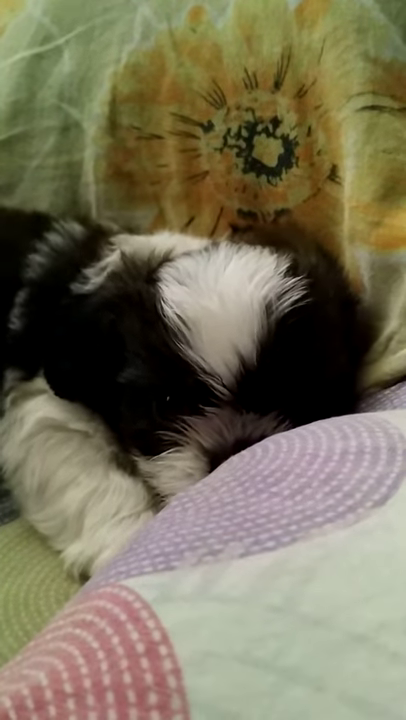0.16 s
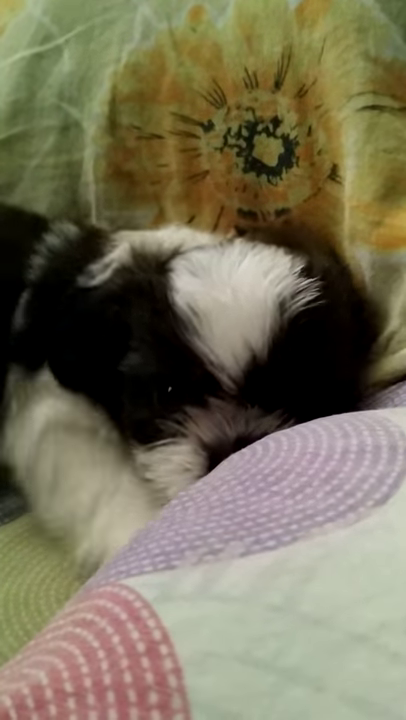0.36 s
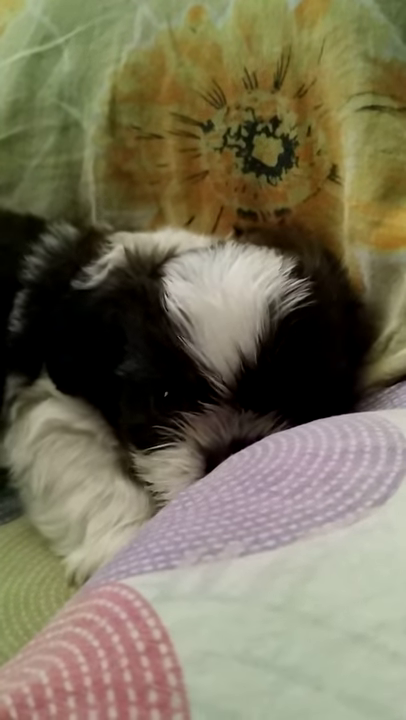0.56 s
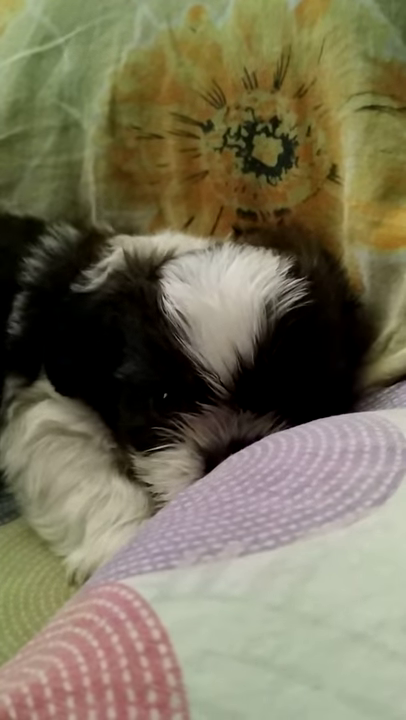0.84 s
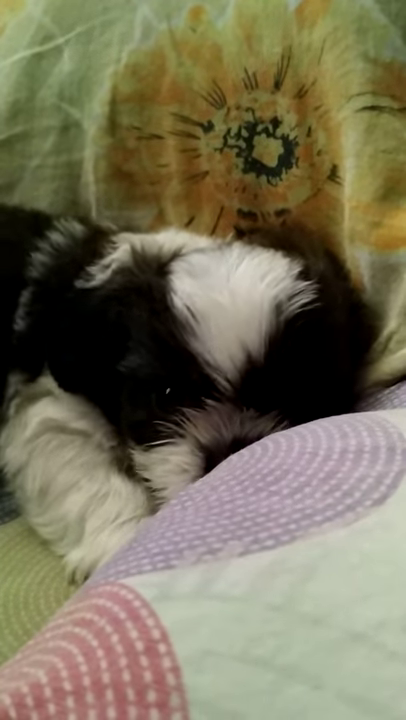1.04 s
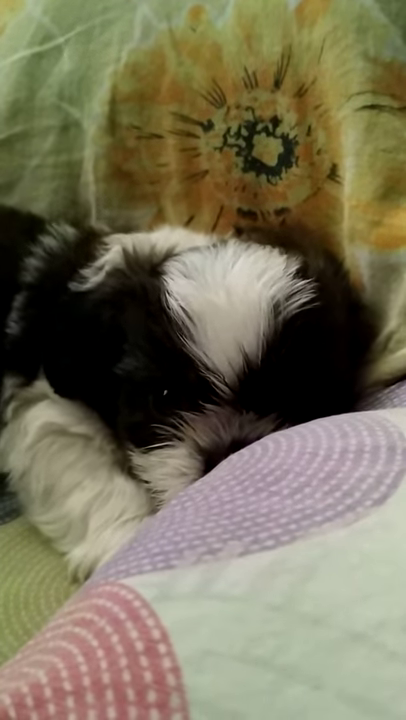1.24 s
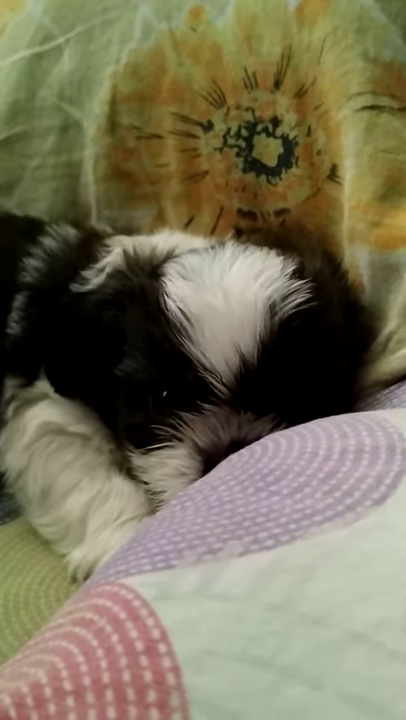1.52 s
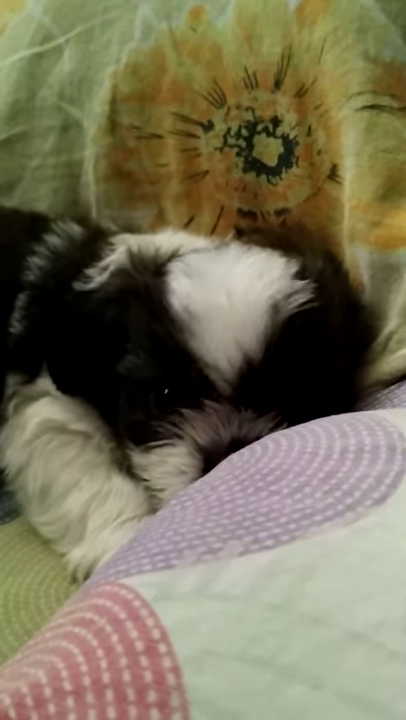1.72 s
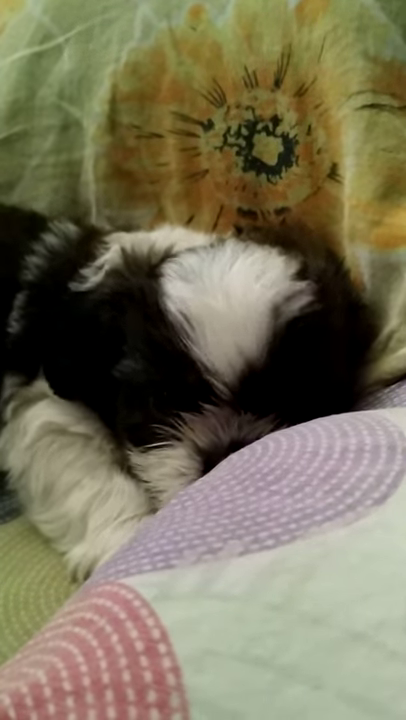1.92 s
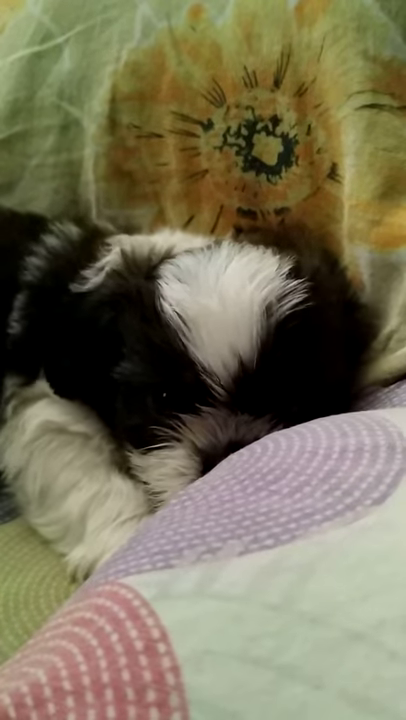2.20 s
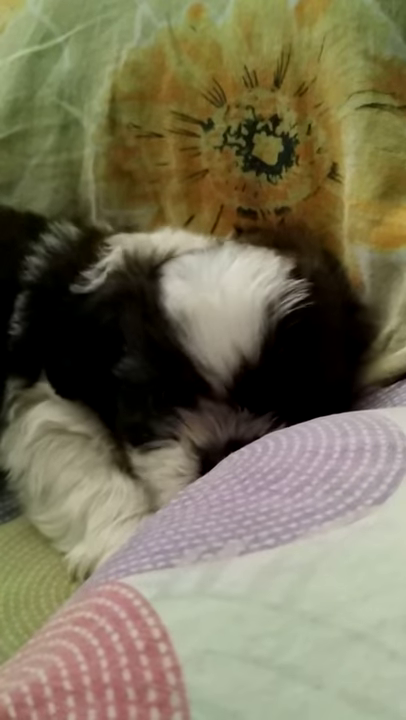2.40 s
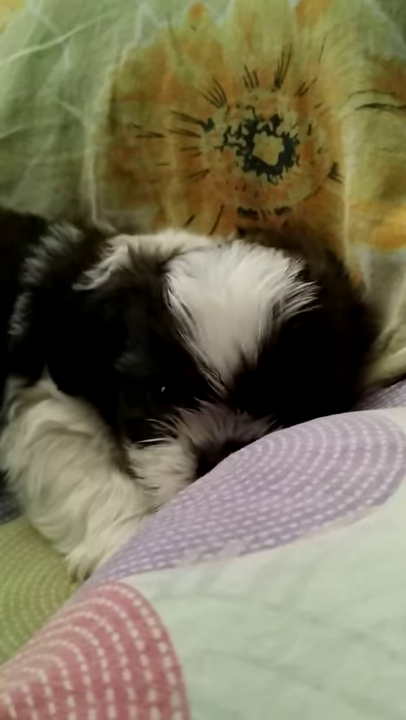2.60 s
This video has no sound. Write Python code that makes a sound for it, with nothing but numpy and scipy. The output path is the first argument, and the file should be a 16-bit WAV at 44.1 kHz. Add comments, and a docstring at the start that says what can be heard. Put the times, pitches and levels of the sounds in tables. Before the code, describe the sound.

A puppy yelps four times, each a short, high, rising-then-falling bark, close to the microphone in a quiet bedroom; bedding rustles softly after the first, and low hum and faint hiss continue underneath.

```python
"""Puppy yelping in a bedroom

A puppy on a bed yelps four times, close by, in a quiet, soft bedroom. Each yelp is a source-filter voice:
harmonics of a pulse train whose pitch arcs up and then sinks, coloured by three moving resonances.
A low flutter joins the first yelp and single creak pulses follow the second. Shaped noise makes the
bedding's rustle, ticks and hiss, the room's short tail and the house's floor and rumble; tones make a hum."""
import sys
import numpy as np
from scipy import signal
from scipy.fft import rfft, irfft
from scipy.io import wavfile
from scipy.ndimage import uniform_filter1d

SR = 44100
rng = np.random.default_rng(int(sys.argv[2]) if len(sys.argv) > 2 else 0)


def output_pcm(signal):
    """Save a mono or channel-first signal as 16-bit PCM at the path in sys.argv[1].

    Samples are clipped to [-1, 1] before scaling.
    """
    pcm = np.clip(np.atleast_2d(signal).T, -1, 1) * 32767
    wavfile.write(sys.argv[1], SR, np.round(pcm).astype(np.int16))


def amplitude_ratio(level_db):
    """Convert a level in decibels to the matching linear amplitude (field) ratio."""
    exponent = np.asarray(level_db, float) / 20
    return 10 ** exponent


N = 121275


def rms_one(x):
    """Normalisation: equal mean power, rms 1."""
    return x / np.sqrt(np.mean(x ** 2) + 1e-20)


def in_time(rows):
    """Linear interpolation: the columns of a table as curves over all samples."""
    s, *columns = np.transpose(rows)
    return [np.interp(np.arange(N) / SR, s, c) for c in columns]


def at_hz(points, hz):
    """Logarithmic frequency scale: a spectrum in dB read between its points."""
    f, db = np.transpose(points)
    return np.interp(np.log(hz), np.log(f), db)


def smooth(x, seconds):
    """Moving average: a running mean over a window."""
    return uniform_filter1d(x, size=max(int(seconds * SR), 1))


def drift(rate_hz):
    """Low-passed noise: two equal poles leave a slow random curve of rms 1."""
    r = np.exp(-2 * np.pi * rate_hz / SR)
    noise = rng.standard_normal(N + SR)
    return rms_one(signal.lfilter([1], [1, -2 * r, r * r], noise)[SR:])   # the first second settles


def band_noise(order, edges_hz, kind, samples=N):
    """Filtered noise: a Butterworth filter selects part of a white spectrum."""
    sos = signal.butter(order, edges_hz, kind, fs=SR, output="sos")
    return signal.sosfilt(sos, rng.standard_normal(samples))


def notch_db(hz):
    """Antiresonance: side cavities of nose and throat cut dips into the spectrum."""
    # columns: centre_hz, width_hz (centre to 1/e of the dip), depth_db
    cavities = [(3390, 360, -8.5), (5714, 460, -7), (8830, 540, -8), (13060, 370, -1)]
    return sum(db * np.exp(-((hz - centre_hz) / width) ** 2) for centre_hz, width, db in cavities)


def coloured(spectrum, hollow=False):
    """Spectral shaping: noise of a given spectrum, rms 1; hollow noise has passed the side cavities."""
    hz = np.maximum(np.arange(N // 2 + 1) * SR / N, 1)
    gain = amplitude_ratio(at_hz(spectrum, hz) + hollow * notch_db(hz))
    return rms_one(irfft(rfft(rng.standard_normal(N)) * gain, N))


def gate(rows):
    """Amplitude envelope: opens just before the first row and closes just after the last."""
    onset_s, release_s = 0.004, 0.0029
    t = np.arange(N) / SR
    opening = np.clip((t - rows[0][0]) / onset_s + 1, 0, 1) ** 2
    return opening * np.clip((rows[-1][0] - t) / release_s + 1, 0, 1)


def house():
    """Superposition: a nearly steady noise floor, an appliance's wavering hum and a deep rumble."""
    # house rumble and microphone hiss, relative spectrum; columns: frequency_hz, density_db (per Hz)
    floor_spectrum = [(12, -48), (20, -7.5), (38, -14), (85, -0.5), (200, -9), (270, -7.5), (400, -12.5),
                      (815, -18), (1300, -27), (2600, -29.5), (4600, -40.5), (15600, -47)]
    # an appliance hums unsteadily; columns: frequency_hz, level_db (raised 1 dB below, before wavering)
    hum_tones = [(123.8, -55), (247.6, -54)]
    # deep rumble as the bed moves; columns: start_s, level_db
    rumble_rows = [(.26, -55), (.34, -45), (.57, -37.5), (1.15, -62)]
    t = np.arange(N) / SR
    floor = amplitude_ratio(-43 + 0.5 * drift(12.0)) * coloured(floor_spectrum)   # rms dB, with slight patchiness in dB
    hum = 0
    for hz, db in hum_tones:
        level = amplitude_ratio(db + 1 + 4.9 * drift(8.8))
        hum = hum + level * np.sin(2 * np.pi * hz * t + 0.38 * drift(7.5))
    deep = band_noise(2, [18, 47.6], "band", N + SR)[SR:]   # the filter settles for a second
    rumble = amplitude_ratio(in_time(rumble_rows)[0]) * gate(rumble_rows) * rms_one(deep)
    return floor + hum + rumble


def bedding():
    """Friction noise: cloth gives a lumpy low rustle, short bright ticks and a thin high hiss."""
    # the bedding shifts; columns: start_s, level_db
    rustle_rows = [(.53, -45), (.562, -38.5), (.588, -42), (.604, -34), (.64, -45)]
    # relative spectrum of the rustle; columns: frequency_hz, density_db (per Hz)
    rustle_colour = [(30, -15), (100, 12.5), (1000, -15), (8000, -43.5)]
    # faint bright ticks of cloth; columns: centre_s, level_db (lowered 6 dB below)
    tick_rows = [(0.583, -44), (1.5525, -51)]
    # the thin hiss; columns: start_s, level_db
    hiss_rows = [(.57, -69), (1.04, -80)]
    tick_s, hiss_hz, hiss_width_hz = 0.0038, 11400, 1000
    t = np.arange(N) / SR
    lumpy_level = amplitude_ratio(in_time(rustle_rows)[0] + 2.06 * drift(26))
    rustle = lumpy_level * gate(rustle_rows) * coloured(rustle_colour)
    tick_level = sum(amplitude_ratio(db - 6) * np.exp(-((t - s) / tick_s) ** 2) for s, db in tick_rows)
    ticks = tick_level * band_noise(4, 7450, "high")
    edges_hz = [hiss_hz - hiss_width_hz / 2, hiss_hz + hiss_width_hz / 2]
    thin = rms_one(band_noise(2, edges_hz, "band"))
    return rustle + ticks + thin * amplitude_ratio(in_time(hiss_rows)[0]) * gate(hiss_rows)


def bedroom(x):
    """Reverberation: a dense tail of dying noise; the soft furnishings leave only mids and treble."""
    t60_s, low_cut_hz, wall_cut_hz = 0.34, 3370, 8000
    t = np.arange(SR) / SR
    tail = rng.standard_normal(SR) * amplitude_ratio(-60 * t / t60_s) * (t > .006)   # silent before the first reflections
    sos = signal.butter(1, [low_cut_hz, wall_cut_hz], "band", fs=SR, output="sos")
    tail = signal.sosfilt(sos, tail)
    return signal.fftconvolve(x, tail / np.sqrt(np.sum(tail ** 2)))[:N]


def creaks():
    """Impulse response: single glottal pulses ring the half-closed throat's damped modes."""
    # last single creak pulses after the second yelp; columns: start_s, pulse_db
    pulses = [(1.286, -38), (1.2907, -34.5), (1.322, -41.5), (1.338, -39.5)]
    # throat modes; columns: frequency_hz, gain_db, t60_s
    modes = [(282, 8.5, 0.02), (930, 2, 0.02), (2150, -9.5, 0.039)]
    clicks, out = np.zeros(N) + 1e-18, 0
    for s, db in pulses:
        clicks[int(s * SR)] = -amplitude_ratio(db)
    for hz, db, t60 in modes:
        r, w = amplitude_ratio(-60 / (t60 * SR)), 2 * np.pi * hz / SR
        out = out + signal.lfilter([0, amplitude_ratio(db) * np.sin(w)], [1, -2 * r * np.cos(w), r * r], clicks)
    return out


def flutter():
    """Second oscillator: a low tone, uneven in pace and strength, plus one a fifth above; wave and level."""
    # low flutter in the throat as the first yelp sinks; columns: start_s, pitch_hz, level_db (before wavering)
    flutter_rows = [(.298, 321.5, -74), (.306, 342, -32), (.316, 322, -39), (.33, 303, -26.5),
                    (.344, 285, -35), (.346, 402, -36), (.354, 399, -26), (.368, 416, -36)]
    hz, db = in_time(flutter_rows)
    turn = 2 * np.pi * np.cumsum(hz * (1 + 0.024 * drift(130))) / SR
    wave = np.sin(turn) + 0.29 * np.cos(turn * 3 / 2)
    return wave, amplitude_ratio(db + 3.1 * drift(120)) * gate(flutter_rows)


def yelp(rows):
    """Source-filter voice: pulse-train harmonics weighted and delayed by moving resonances, with air noise."""
    # widths_hz of the three resonances
    widths = [342, 478, 385]
    # upper resonances of nose and head, with the microphone; columns: frequency_hz, gain_db
    head = [(250, 7), (600, -3), (1500, -8), (3000, 1.5), (4800, 0.5), (6300, 28.5), (7800, 34), (9500, 32),
            (11500, 43.5), (12800, 49), (14000, 58.5), (15500, 51)]
    # relative spectrum of turbulent air in the throat; columns: frequency_hz, density_db (per Hz)
    air_spectrum = [(500, -45), (2300, -11), (4500, -16), (6800, -20), (9500, -16.5), (13000, -19),
                    (15300, -16), (16300, -40)]
    # every third pulse is stronger and early; columns: start_s, depth (0-1)
    tripling = [(.211, 0.06), (.217, 0.17), (.228, 0.08), (.234, 0)]
    hz, effort_db, tilt_db, *centres = in_time(rows)
    opened = gate(rows)

    # taut folds change pitch more slowly: the top of a yelp is a round arc
    taut = np.clip((hz - 1077) / 120, 0, 1)
    arc_s, smoothing_s = 0.0121, 0.0017
    hz = taut * smooth(hz, arc_s) + (1 - taut) * smooth(hz, smoothing_s)
    jitter = .002 + 0.068 * np.clip(1 - hz / 600, 0, 1)   # the folds are less steady in the creak
    hz = hz * (1 + jitter * drift(100))
    level = amplitude_ratio(smooth(effort_db, smoothing_s)) * opened

    on = opened > 0
    pitch, sample = hz[on], np.arange(on.sum())
    k = np.arange(1, 41)[:, None]   # harmonic numbers
    f, turn = k * pitch, 2 * np.pi * np.cumsum(pitch) / SR
    gain = amplitude_ratio(tilt_db[on] * np.log2(k) + at_hz(head, f) + notch_db(f)) * (f < 15700)
    ringing = 0
    for centre, width in zip(centres, widths):
        c = centre[on]
        peak = c ** 2 / (c ** 2 - f ** 2 + 1j * f * width)
        gain = gain * np.abs(peak)
        ringing = ringing + 1j * f * peak / c

    # as pitch sinks, slack folds scatter the phases of the upper harmonics; less so while it still climbs
    slack = np.sqrt(np.clip(1 - pitch / 1080, 0, 1)) * np.where(sample > pitch.argmax(), 1, .45)
    chance = drift(300)[(sample + 1999 * k) % N]   # shifted copies: each harmonic moves on its own
    scatter = 1.5 * np.minimum(f / 5000, 1) ** 3 * slack * chance   # radians
    # upper harmonics flare and fade each on its own, fully so above 8 kHz
    flare = drift(25)[(sample + 2999 * k) % N]
    gain = gain * amplitude_ratio(3 * np.minimum(f / 8000, 1) * flare)   # dB
    uneven = in_time(tripling)[0][on] * np.cos(turn / 3)

    # the pulse takes a share .55 of the resonances' phase delay
    phase = k * (turn + uneven) + .55 * np.angle(ringing) + scatter
    voice = np.zeros(N)
    voice[on] = -(1 + uneven) * level[on] * (gain * np.cos(phase)).sum(axis=0)
    # the power below 1 makes the air fade more slowly than the voice
    air_level = amplitude_ratio(-41) * np.maximum(smooth(np.abs(voice), 0.014), 0) ** .62
    return voice + air_level * coloured(air_spectrum, hollow=True)


def puppy():
    """Amplitude modulation: the flutter shakes the yelping voice and sounds beside it, with the creaks."""
    # one table per yelp; columns: start_s, pitch_hz, effort_db, tilt_db (pulse sharpness per octave),
    # resonance_1_hz, resonance_2_hz, resonance_3_hz
    yelp_1 = [(0.192, 601, -38, -4, 1340, 2440, 4430), (0.2, 583, -31.5, 0.5, 1510, 2620, 4660),
              (0.207, 642, -27, -3, 1590, 2330, 4350), (0.2095, 945, -26.5, 1, 1460, 2300, 4300),
              (0.214, 997, -22, 2.2, 1460, 2370, 4270), (0.217, 1148, -26.5, 2.4, 1610, 2600, 4070),
              (0.238, 1242, -24, 0, 1780, 3030, 4630), (0.268, 1286, -26, -2, 1650, 3300, 5010),
              (0.3, 1214, -30.5, 4.5, 1180, 2500, 4900), (0.31, 1160, -31.5, 7, 1120, 2070, 4400),
              (0.328, 945, -30.5, 2.5, 1130, 1930, 4350), (0.356, 723, -31.5, 2, 760, 2040, 4500),
              (0.37, 606, -42, 1, 670, 2180, 4700)]
    yelp_2 = [(1.04, 583, -41.5, -3, 1130, 2060, 4450), (1.056, 644, -28, -1, 1130, 2150, 4530),
              (1.059, 740, -26.5, 1.5, 1190, 1660, 4417), (1.062, 1000, -23.5, -0.2, 1165, 2680, 4280),
              (1.075, 1173, -18.5, 0.45, 1066, 3100, 4360), (1.109, 1308, -13.5, -2.5, 1003, 3530, 4950),
              (1.127, 1222, -24.5, 3, 1169, 2190, 4900), (1.172, 792.3, -27, 2, 1110, 2000, 4520),
              (1.177, 529.3, -32, 1, 930, 2030, 4800), (1.184, 445.6, -33.5, 0.3, 970, 2080, 4830),
              (1.206, 367.7, -35, 0.6, 945, 2040, 4900), (1.216, 271.4, -41.5, 0.9, 940, 2060, 4700),
              (1.233, 282, -41, -5, 1030, 2120, 4170), (1.256, 264, -37.5, -3.5, 1040, 2190, 4100)]
    yelp_3 = [(1.82, 624, -48, -2, 1160, 2080, 4313), (1.831, 800, -32, -1, 1200, 1840, 4030),
              (1.862, 1170, -20, -1, 1050, 3320, 4370), (1.874, 1258, -24, -0.7, 1165, 3150, 4740),
              (1.89, 1211, -22, -2.3, 1116, 2950, 4800), (1.913, 982, -24, 0.6, 1144, 2220, 4670),
              (1.93, 705.3, -27, 1, 810, 2004, 4630), (1.965, 363.5, -38, -0.5, 890, 1870, 4700),
              (1.972, 327.5, -35.5, -2, 860, 2070, 4330), (1.994, 290.5, -41.5, -4, 750, 2240, 4076),
              (2.017, 215, -47, -3.5, 784, 2265, 4026)]
    yelp_4 = [(2.396, 630, -37.5, -7.5, 1860, 2480, 4800), (2.41, 872, -33, -7, 1780, 3060, 4540),
              (2.434, 1139, -22.5, -5.5, 1740, 2910, 4740), (2.442, 1227, -29, 2.5, 1380, 2670, 4760),
              (2.455, 1204, -28.5, 1.2, 1210, 2200, 4700), (2.468, 1017, -27.5, 1, 1250, 2220, 4560),
              (2.488, 718, -28.3, -1, 960, 2130, 4670), (2.502, 428, -37.5, 2, 815, 2125, 4600),
              (2.506, 378.6, -32, -2.5, 970, 2240, 4809), (2.528, 286.6, -41.5, -5, 890, 2420, 4764),
              (2.538, 277, -44.5, -6.5, 1198, 2519, 4726)]
    wave, level = flutter()
    shaken = 1 + 0.28 * wave * level / level.max()
    yelps = sum(yelp(rows) for rows in (yelp_1, yelp_2, yelp_3, yelp_4))
    return yelps * shaken + np.sqrt(2) * wave * level + creaks()


def scene():
    """Linear superposition: puppy, its room tail 16 dB down, bedding and house in one channel."""
    dog = puppy()
    return (dog + amplitude_ratio(-16) * bedroom(dog) + bedding() + house())[None]


def low_pass(x):
    """Removes everything above the highest recorded frequency."""
    return signal.sosfilt(signal.butter(12, 15780, fs=SR, output="sos"), x)


def record(dry):
    """Signal chain: the finished mix passes to its last stage at unchanged level."""
    return low_pass(dry)


dry = scene()
out = record(dry)
output_pcm(out)
```